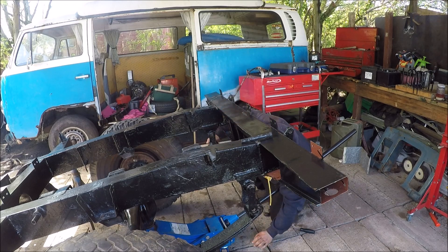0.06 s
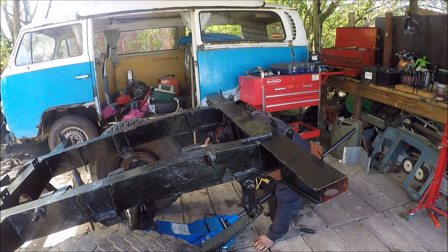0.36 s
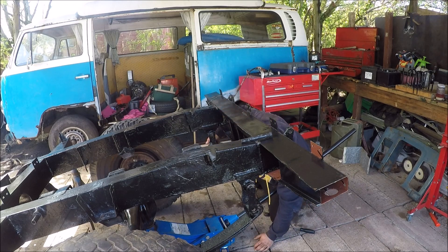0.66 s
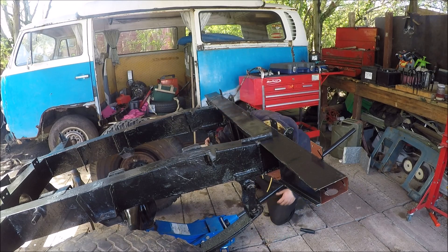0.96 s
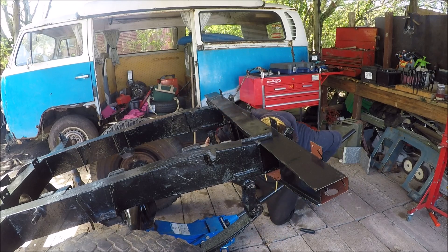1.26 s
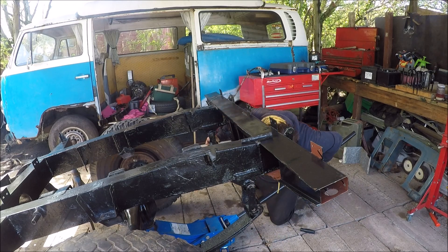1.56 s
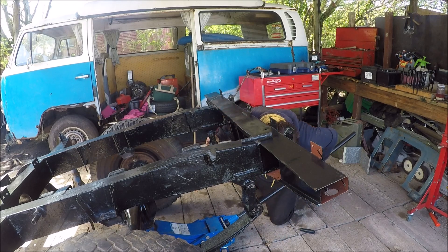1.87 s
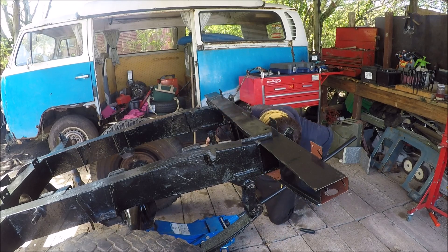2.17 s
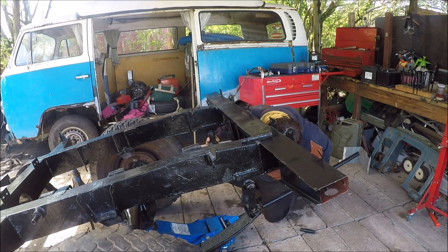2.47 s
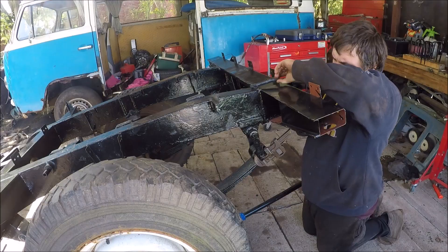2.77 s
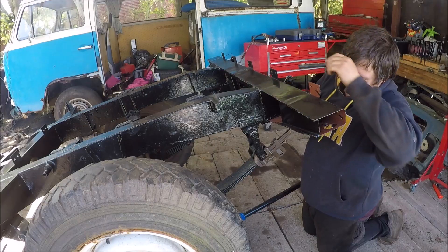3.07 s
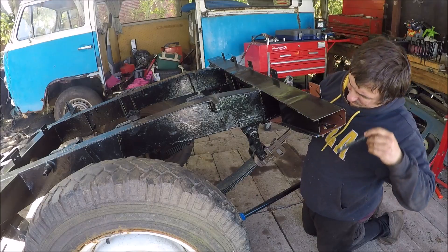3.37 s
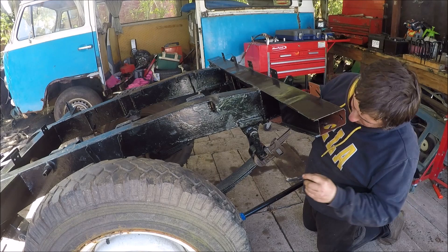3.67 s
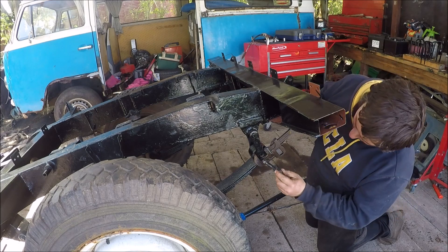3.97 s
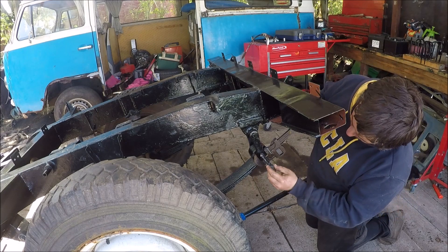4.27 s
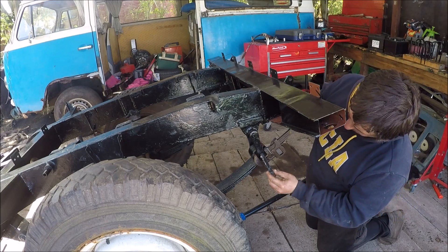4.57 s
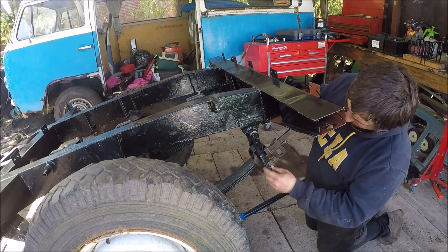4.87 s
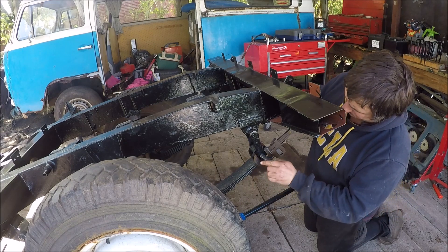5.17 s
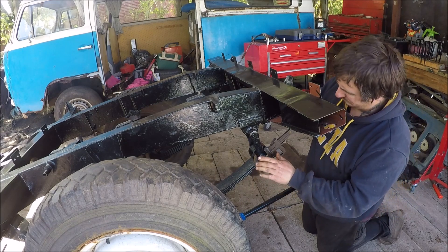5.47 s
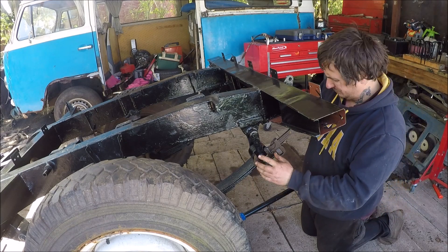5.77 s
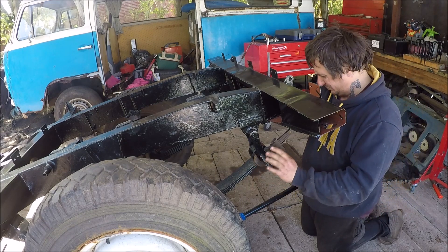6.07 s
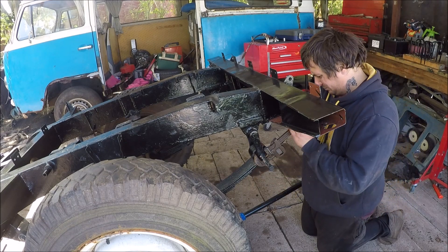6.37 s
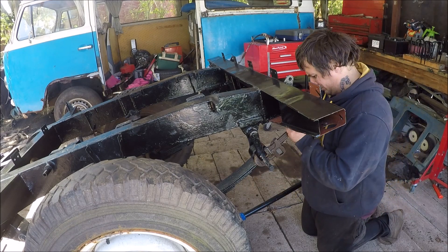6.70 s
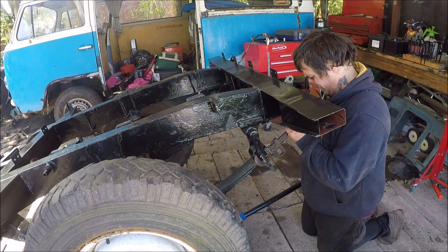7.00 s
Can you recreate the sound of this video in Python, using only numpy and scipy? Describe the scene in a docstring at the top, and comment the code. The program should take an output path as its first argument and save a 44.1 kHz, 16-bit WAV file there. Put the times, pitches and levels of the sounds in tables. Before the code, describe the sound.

Small birds give faint rising calls and thin whistles throughout, over a quiet outdoor hush. In the first second, steel is dragged over steel twice, sticking and slipping with a groaning rasp and sharp catches; a weaker scrape and a knock fall between the strokes. Light knocks and tool taps follow from about 1.1 to 2.1 seconds, then clothes rustle briefly at 2.3. A small metal part ticks at 2.6, and a steel spring clanks into place with quick, bright, ringing blows, the loudest at 2.8 seconds. After a pause, a bolt knocks against a steel bracket at 4.2, several times with a bright ping around 4.6, and again near 5 seconds, ringing lower than the spring. Very faint taps come at 5.6 and 6.7. From about 4.4 seconds to the end, a light breeze rumbles softly on and off on the microphone.

```python
"""A leaf spring is lined up with its hanger on a bare vehicle chassis, in an open-sided workshop.
Small birds call from the trees throughout. First steel is dragged twice, sticking and slipping, with a
faint scrape between. Light knocks and tool taps follow, then clothes rustle. Near 2.7 s a small part
ticks and the spring clanks into place, ringing. From 4.2 s a bolt is knocked against the hanger,
and a light breeze rocks the microphone on and off until the end."""
import sys
import numpy as np
from scipy import signal
from scipy.fft import rfft, irfft
from scipy.io import wavfile
from scipy.ndimage import uniform_filter1d

SR = 44100
rng = np.random.default_rng(int(sys.argv[2]) if len(sys.argv) > 2 else 0)


def transcribe(signal):
    """Save signal, clipped to [-1, 1], as a 16-bit WAV file at the path in sys.argv[1]."""
    frames = np.atleast_2d(signal).T
    limited = np.clip(frames, -1, 1)
    pcm = np.round(limited * 32767).astype(np.int16)
    wavfile.write(sys.argv[1], SR, pcm)


N = 314874
T = np.arange(N) / SR
ONE_SECOND = np.arange(SR) / SR
HIGHEST_HZ = 15400


def amp(db):
    """Turns decibels into a number to multiply by."""
    return 10 ** (np.asarray(db) / 20)


def unit(x):
    """Scales a sound to an average (rms) size of 1."""
    return x / np.sqrt(np.mean(x ** 2) + 1e-20)


def read(points, hz):
    """Reads between the rows of a table, with octaves evenly spaced."""
    row_hz, value = np.transpose(points)
    return np.interp(np.log(hz + 1), np.log(row_hz + 1), value)


def add(mix, start_s, sound):
    """Mixes a sound in at the given time."""
    part = mix[max(0, round(start_s * SR)):][:len(sound)]
    part += sound[:len(part)]


def colour(x, points):
    """Sets a sound's colour, its balance of low and high pitches, at an average size of 1."""
    gain = amp(read(points, np.fft.rfftfreq(len(x), 1 / SR)))
    return unit(irfft(rfft(x) * gain, len(x)))


def band(x, low_hz, high_hz, order=4):
    """Keeps the pitches between two limits."""
    return signal.sosfilt(signal.butter(order, [low_hz, high_hz], "band", fs=SR, output="sos"), x)


def swell(start_s, length_s, rise_db_per_s, fall_db_per_s):
    """Loudness that builds up to the start, holds for the length, then dies away."""
    early, late = np.maximum(start_s - T, 0), np.maximum(T - start_s - length_s, 0)
    return amp(-rise_db_per_s * early - fall_db_per_s * late)


# colours of the outdoor hush and of wind on the microphone: pitch_hz, level_db
HUSH_COLOUR = [(41, -17), (70, -1.5), (220, -5), (847, -7), (1480, -11.5), (2540, -14), (3330, -14.5),
               (5840, -21.5), (12300, -25), (15000, -25.5)]
WIND_COLOUR = [(2, 16), (4, 20), (10, 12.5), (22, -5.5), (35, -6.5), (60, -20), (120, -35), (400, -75)]
# gusts of the breeze: start_s, length_s, level_db
GUSTS = [(4.432, 0.26, -53.5), (5.047, 0.43, -47), (5.686, 0.2, -54.5), (6.287, 0.77, -55)]
def air(hush_db=-66, calm_db=-66.5):
    """A steady outdoor hush, and a low rumble that grows when a gust pushes on the microphone."""
    hush = amp(hush_db) * colour(rng.standard_normal(N), HUSH_COLOUR)
    rumble = colour(rng.standard_normal(N), WIND_COLOUR)
    gusts = sum(amp(level_db) * swell(start_s, length_s, rise_db_per_s=86, fall_db_per_s=96)
                for start_s, length_s, level_db in GUSTS)
    return hush + (amp(calm_db) + gusts) * rumble / np.std(band(rumble, 12.37, 70))


def bird_note(pitch_hz, flutter):
    """A nearly pure tone that follows a pitch curve and wavers quickly by the share `flutter`."""
    waver = unit(uniform_filter1d(rng.standard_normal(len(pitch_hz)), size=60))
    phase = 2 * np.pi * np.cumsum(pitch_hz * (1 + flutter * waver)) / SR
    return signal.windows.tukey(len(pitch_hz), 0.4) * np.sin(phase)


# a finch's rising calls: start_s, level_db
FINCH_CALLS = [(.32, -63.5), (0.924, -60.5), (2.02, -63.5), (2.63, -60.5), (3.06, -58), (3.701, -58.5),
               (4.689, -60.5), (5.228, -57.5), (6.258, -57.5), (6.886, -61)]
# other birds' thin whistles: start_s, length_s, pitch_hz, level_db
WHISTLES = [(0.063, 0.05, 4620, -69), (0.643, 0.029, 4320, -70), (1.16, 0.03, 3500, -65),
            (1.263, 0.026, 3570, -66), (1.497, 0.029, 3520, -65), (1.506, 0.065, 4250, -63),
            (1.598, 0.11, 7480, -74), (5.623, 0.061, 4160, -61), (6.687, 0.03, 3020, -78)]
def birds(finch_s=0.115, low_hz=2917, high_hz=5060, echo_s=0.5):
    """Rising calls and thin whistles, smeared by echoes from the trees and walls."""
    calls = np.zeros(N)
    climb = np.linspace(0, 1, round(finch_s * SR))
    sweep_hz = low_hz + (high_hz - low_hz) * climb ** 1.9  # rises ever faster
    arch_db = climb + 12 * (np.sin(np.pi * climb) - 1)  # loudest near the middle
    for start_s, level_db in FINCH_CALLS:
        add(calls, start_s, amp(level_db + arch_db) * bird_note(sweep_hz, flutter=0.023))
    for start_s, length_s, pitch_hz, level_db in WHISTLES:
        slide_up = 1 - 0.0405 * np.linspace(1, 0, round(length_s * SR)) ** 2
        flutter = 0.04 * (0.0283 / length_s) ** 2  # short whistles waver most
        add(calls, start_s, amp(level_db) * bird_note(pitch_hz * slide_up, flutter))
    echoes = rng.standard_normal(SR) * amp(-60 * ONE_SECOND / echo_s)
    return 0.3 * calls + signal.fftconvolve(calls, echoes / np.linalg.norm(echoes))[:N]


def slips(per_s, spread_db):
    """Tiny clicks of uneven size, made as two surfaces stick and slip."""
    clicks = (rng.random(N) < per_s / SR) * rng.choice([-1, 1], N)
    return unit(clicks * amp(spread_db * np.minimum(rng.exponential(1, N), 3)))


# colour of rubbing cloth: pitch_hz, level_db
CLOTH_COLOUR = [(71, -40), (120, -11), (310, 1.5), (446, 2.5), (785, -2), (1180, -1), (1800, -8.5),
                (2920, -3.5), (7250, -23), (15000, -31)]
def rustle(level_db=-52):
    """Clothes brush the paving once, their fibres catching on the stone."""
    brush = amp(level_db) * swell(start_s=2.295, length_s=0.046, rise_db_per_s=290, fall_db_per_s=370)
    return brush * colour(slips(per_s=5300, spread_db=2), CLOTH_COLOUR)


def ring(tones):
    """Struck steel's own tones: each drops 60 dB in its fade_s; its sign depends on the spot struck."""
    signs = rng.choice([-1, 1], len(tones))
    return sum(sign * amp(level_db - 60 * ONE_SECOND / fade_s) * np.sin(2 * np.pi * hz * ONE_SECOND)
               for (hz, level_db, fade_s), sign in zip(tones, signs))


# the washer's ringing tones: pitch_hz, level_db, fade_s
WASHER_TONES = [(3270, -4, 0.084), (3520, 5, 0.1), (5491, -7, 0.071), (7704, -2, 0.023), (8300, 0, 0.054),
                (9275, -18, 0.16), (11230, -9, 0.14), (11900, 1, 0.086), (12220, -15, 0.21),
                (12920, -4, 0.14)]
def washer(start_s=2.608, level_db=-62, chatter_depth=1.3):
    """A small steel part, perhaps a washer, gives a thin, rough tick as it chatters on the spring."""
    out = np.zeros(N)
    chatter = 1 + chatter_depth * unit(uniform_filter1d(rng.standard_normal(SR), size=40))
    add(out, start_s, amp(level_db) * chatter * ring(WASHER_TONES))
    return out


# how long the chassis and workshop ring at each pitch: pitch_hz, fade_s
WASH_FADES = [(200, 0.88), (600, 0.67), (1200, 0.4), (3000, 0.23), (6000, 0.21), (12000, 0.04)]
def wash(wash_colour):
    """Countless weak tones and echoes blur into one noise, whose high pitches die first."""
    noise = colour(rng.standard_normal(SR), wash_colour)
    hz, t, slices = signal.stft(noise, SR, nperseg=256)
    fade = amp(-60 * t / read(WASH_FADES, hz)[:, None])
    return unit(signal.istft(slices * fade, SR, nperseg=256)[1][:SR])


# first echoes off the paving and the chassis rails: delay_s, level_db
ECHOES = [(.0052, -14), (0.0149, -8), (0.023, -35)]
def blows(hits, tones, part_colour, tones_db, crack_db, crack_s, gain_db):
    """Each blow is a short crack with echoes, ringing tones and a wash; gain_db shifts every blow."""
    out, t = np.zeros(N), ONE_SECOND
    echoes = sum(amp(db) * (t > delay_s) * np.exp(-abs(t - delay_s) / crack_s) for delay_s, db in ECHOES)
    burst = np.exp(-t / crack_s) + echoes
    contact = 1 - np.exp(-t / 0.00035)  # the force builds in a fraction of a millisecond
    thump_hz, body_hz, treble_hz, top_hz = 450, 830, 1420, 10000
    for start_s, level_db, thump_db, hardness_db_per_octave in hits:
        crack = unit(colour(rng.standard_normal(SR), part_colour) * burst)
        hit = amp(tones_db) * unit(ring(tones)) + wash(part_colour) + amp(crack_db) * crack
        # a heavy blow adds bass, a hard one adds treble
        top_db = hardness_db_per_octave * np.log2(top_hz / treble_hz)
        balance = [(thump_hz, thump_db), (body_hz, 0), (treble_hz, 0), (top_hz, top_db)]
        hit = colour(np.pad(hit, (0, SR)), balance)[:SR]
        hit = band(contact * hit, 164, HIGHEST_HZ)
        add(out, start_s, amp(level_db + gain_db) * hit / np.std(hit[:SR // 33]))
    return out


# colour of the crack and wash, shared by tool taps and hanger knocks: pitch_hz, level_db
KNOCK_COLOUR = [(150, -9), (230, -13.5), (320, -1.5), (600, 2.5), (1050, 7), (1350, -5.5), (1600, -1.5),
                (2100, -5), (2500, -6), (3200, -0.5), (4300, -13), (5500, -12.5), (7500, -38), (15000, -74)]
# the tool's ringing tones: pitch_hz, level_db, fade_s
TOOL_TONES = [(926, -28, 0.17), (950, 3.5, 0.16), (1980, -9, 0.028), (1880, 11, 0.057), (3020, 5, 0.093),
              (5270, -25, 0.057), (7700, -16, 0.083)]
# light taps: start_s, level_db, thump_db, hardness_db_per_octave
TOOL_TAPS = [(1.827, -60, 10, 3), (1.957, -52.5, -4, 4), (6.724, -62.5, 11, -18)]
def tool():
    """A hand tool taps lightly and rings for a moment."""
    return blows(TOOL_TAPS, TOOL_TONES, KNOCK_COLOUR,
                 tones_db=7.5, crack_db=5.5, crack_s=0.0015, gain_db=-4.5)


def judder(per_s, jitter, fade_s, floor):
    """Steel sticks and lets go at uneven times; each release is a quickly fading burst."""
    starts_s = np.cumsum(np.exp(jitter * rng.standard_normal(N // 100)) / per_s)
    since_s = T - np.append(0, starts_s)[np.searchsorted(starts_s, T)]
    return unit(floor + np.exp(-since_s / fade_s))


def stroke(start_s, length_s, rise_db_per_s, arch_db, fall_db_per_s):
    """Loudness of one dragging stroke, which presses hardest halfway."""
    pressure = np.sin(np.pi * np.clip((T - start_s) / length_s, 0, 1))
    return swell(start_s, length_s, rise_db_per_s, fall_db_per_s) * amp(arch_db * (pressure - 1))


# colour of the scraping: pitch_hz, level_db
DRAG_COLOUR = [(88, -60), (150, -34), (312, -46), (378, 1.5), (495, -30), (567, -1), (742, -5), (833, -3),
               (1090, -1), (1230, -2.5), (1980, -11), (3270, -11.5), (4210, -19.5), (5510, -11),
               (15000, -36)]
# the dragged steel's tones (wider ones die sooner): pitch_hz, width_hz, level_db
DRAG_TONES = [(565, 41, 0), (834, 24, -4), (1270, 120, -5), (1460, 72, -5), (1600, 15, -6), (2150, 50, -9),
              (2360, 40, -11), (2770, 51, -13), (3240, 42, -9), (3590, 33, -12), (3810, 140, -19)]
# strokes of steel over steel: start_s, length_s, hollow_db, groan_db, rasp_db, grit_db
STROKES = [(0.115, 0.15, -59, -46, -42.5, -53), (0.373, 0.089, -65, -50.5, -56.5, -89),
           (0.75, 0.17, -47.5, -44.5, -45, -53.5)]
# the steel catches as it slides: start_s, level_db
CATCHES = [(0.114, -45), (.245, -45), (.735, -40), (0.807, -37), (.860, -47), (.907, -41)]
def drag():
    """Juddering slips set the dragged steel ringing; a few larger catches snap out brightly."""
    out, t = np.zeros(N), ONE_SECOND
    rubbing = unit(slips(per_s=9000, spread_db=2.5)
                   * judder(per_s=115, jitter=0.35, fade_s=0.002, floor=0.13))
    steel = unit(sum(amp(db) * width_hz * np.exp(-np.pi * width_hz * t) * np.sin(2 * np.pi * hz * t)
                     for hz, width_hz, db in DRAG_TONES))
    direct = colour(rubbing, DRAG_COLOUR)
    ringing = unit(signal.fftconvolve(rubbing, steel)[:N])
    room = unit(signal.fftconvolve(rubbing, wash(DRAG_COLOUR))[:N])
    scrape = direct + room + amp(1) * ringing
    hollow = band(ringing, 536, 587, order=2)
    groan = band(scrape, 310, 1030)
    rasp = band(scrape, 1347, 4220)
    grit = band(direct + 0.5 * room, 3800, 20000)  # the treble arrives mostly direct
    # how each layer follows a stroke: sound, rise_db_per_s, arch_db, fall_db_per_s
    layers = [(hollow, 274, 6.4, 97), (groan, 274, 6.4, 97), (rasp, 580, 5.4, 240), (grit, 1200, 9.9, 840)]
    for start_s, length_s, *levels_db in STROKES:
        for (sound, *shape), level_db in zip(layers, levels_db):
            out += amp(level_db) * stroke(start_s, length_s, *shape) * unit(sound)
    for start_s, level_db in CATCHES:
        snap = rng.standard_normal(SR) * np.exp(-t / 0.0056)
        add(out, start_s, amp(level_db) * band(snap, 2500, 5500, order=2))
    return out


# the bolt's ringing tones: pitch_hz, level_db, fade_s
BOLT_TONES = [(2980, -7, 0.2), (3450, -10, 0.049), (4020, 3.5, 0.05), (4400, -26, .03), (10280, -18, 0.064)]
# the bolt's tip meets steel: start_s, level_db
BOLT_PINGS = [(4.225, -52.5), (4.617, -33.5), (4.662, -52)]
def bolt(contact_s=0.0004):
    """The small bolt gives its own bright ping as it strikes."""
    out = np.zeros(N)
    contact = 1 - np.exp(-ONE_SECOND / contact_s)
    for start_s, level_db in BOLT_PINGS:
        add(out, start_s, amp(level_db) * contact * ring(BOLT_TONES))
    return out


# the hanger's ringing tones: pitch_hz, level_db, fade_s
HANGER_TONES = [(404, -16, 0.61), (533, -9, 0.53), (565, -8, 0.52), (598, -12, 0.5), (624, -10, 0.49),
                (673, -9, 0.47), (790, -6, 0.44), (828, 0, 0.43), (877, -7, 0.41), (974, -7, 0.39),
                (1066, -7, 0.38), (1222, -12, 0.35), (1416, -16, 0.33), (1583, -12, 0.31),
                (1755, -19, 0.29), (1900, -22, 0.28), (2045, -17, 0.27), (2145, -17, 0.26),
                (2210, -18, 0.26), (2848, -20, 0.23), (3015, -10, 0.22), (3429, -13, 0.21)]
# knocks on the hanger: start_s, level_db, thump_db, hardness_db_per_octave
HANGER_KNOCKS = [(0.399, -42.5, 7, -10), (1.096, -50.5, 16.5, 0), (1.214, -53.5, 3, -12),
                 (2.091, -56.5, 1, -18), (4.223, -31, -1.5, -6), (4.621, -32.5, 0, 3.5),
                 (4.647, -32, -3, -7), (4.663, -41.5, -8, -0.5), (4.921, -45, 13.5, 2), (4.996, -49, 11, 5),
                 (5.006, -35, -2, -15), (5.637, -61, 0, 10)]
def hanger():
    """The hanger, the bracket that holds the spring, is knocked and rings with mostly lower tones."""
    return blows(HANGER_KNOCKS, HANGER_TONES, KNOCK_COLOUR,
                 tones_db=3, crack_db=1, crack_s=0.0065, gain_db=-6.5)


# colour of the spring's crack and wash: pitch_hz, level_db
SPRING_COLOUR = [(150, -43), (330, -23.5), (600, -14), (950, -4), (1300, -7), (1560, 0), (1850, -7.5),
                 (2300, 0.5), (3000, 3.5), (3700, -2.5), (4200, -12.5), (5800, -9), (7800, -24.5),
                 (15000, -47)]
# the spring's ringing tones: pitch_hz, level_db, fade_s
SPRING_TONES = [(533, -18, 0.53), (828, -11, 0.43), (900, -10, 0.41), (969, -7, 0.39), (1186, -9, 0.36),
                (1266, -3, 0.34), (1459, -8, 0.32), (1534, -3, 0.31), (1580, -3, 0.31), (1653, -3, 0.3),
                (2149, -9, 0.26), (2272, -6, 0.26), (2360, -10, 0.25), (2492, -3, 0.25), (2519, -5, 0.24),
                (2698, -7, 0.24), (2826, -7, 0.23), (2923, 0, 0.23), (3025, -1, 0.22), (3121, -5, 0.22),
                (3196, -2, 0.22), (3416, -1, 0.21), (3580, -11, 0.2), (3741, -5, 0.2), (4495, -13, 0.18),
                (5222, -16, 0.17), (5663, -14, 0.16), (5816, -11, 0.16), (6035, -17, 0.16),
                (10300, -27, .2)]
# blows on the spring, after a faint first row that fills out the washer's tick: start_s, level_db, thump_db,
# hardness_db_per_octave
SPRING_CLANKS = [(2.607, -57, 8, 15), (2.723, -32.5, -1, -6), (2.766, -35.5, 8, -2.5),
                 (2.796, -21, -1.5, -0.4)]
def spring():
    """The leaf spring clanks into place with three quick, ringing blows, the last the loudest; a faint first
    row gives the small part's tick its lower ring."""
    return blows(SPRING_CLANKS, SPRING_TONES, SPRING_COLOUR,
                 tones_db=2, crack_db=3.5, crack_s=0.0085, gain_db=-7)


def scene():
    """All the sounds meet at one microphone."""
    return (spring() + hanger() + tool() + bolt() + washer() + drag() + rustle() + birds() + air())[None]


def record(dry):
    """Cuts away the very highest treble."""
    low_pass = signal.firwin(511, HIGHEST_HZ, window=("kaiser", 9), fs=SR)
    padded = np.pad(dry[0], len(low_pass) // 2, mode="edge")
    return signal.oaconvolve(padded, low_pass, "valid")[None]


dry = scene()
out = record(dry)
transcribe(out)
```